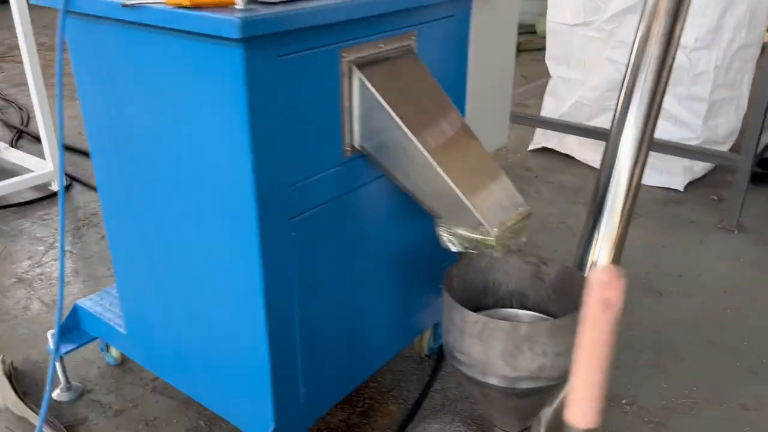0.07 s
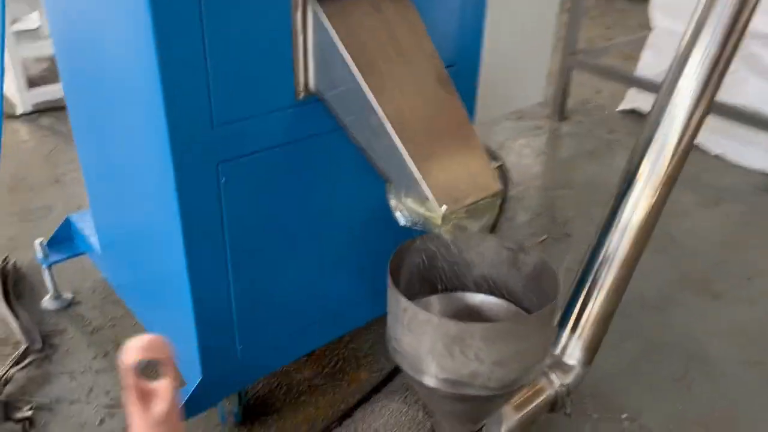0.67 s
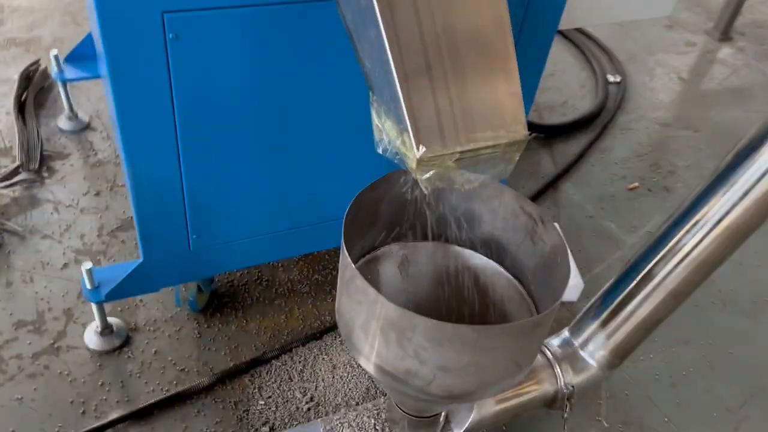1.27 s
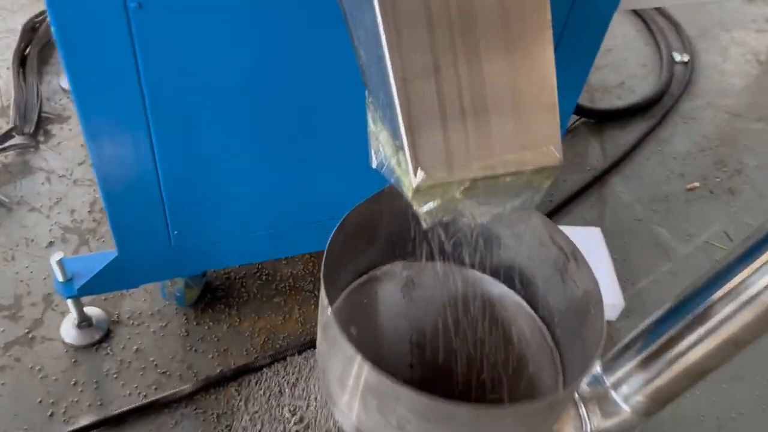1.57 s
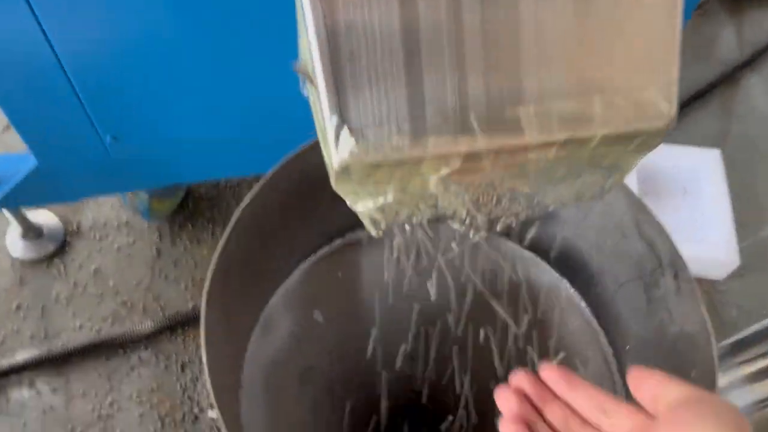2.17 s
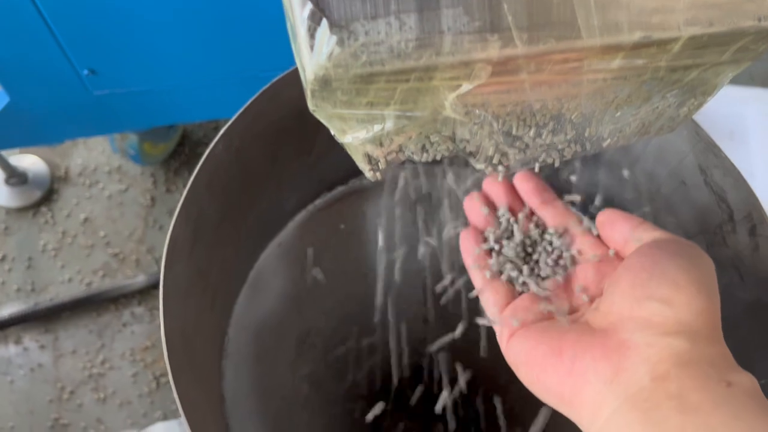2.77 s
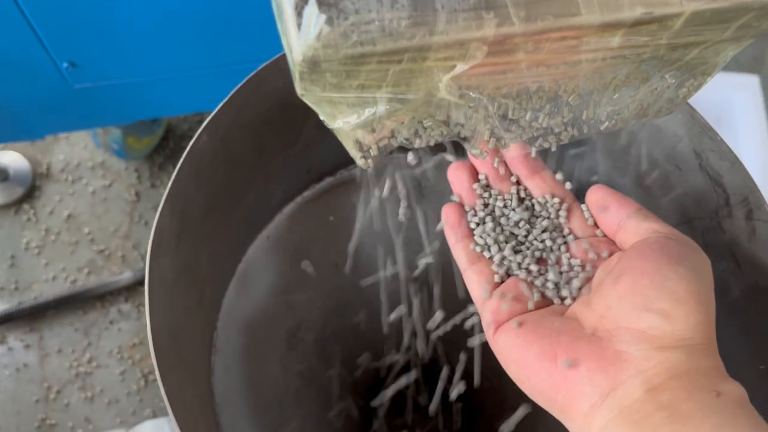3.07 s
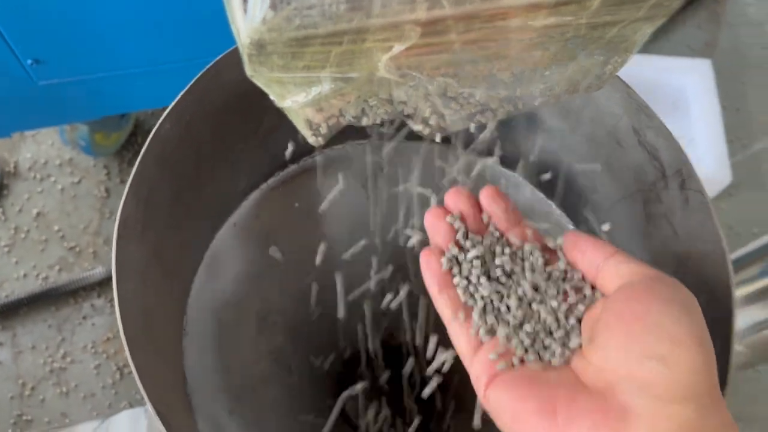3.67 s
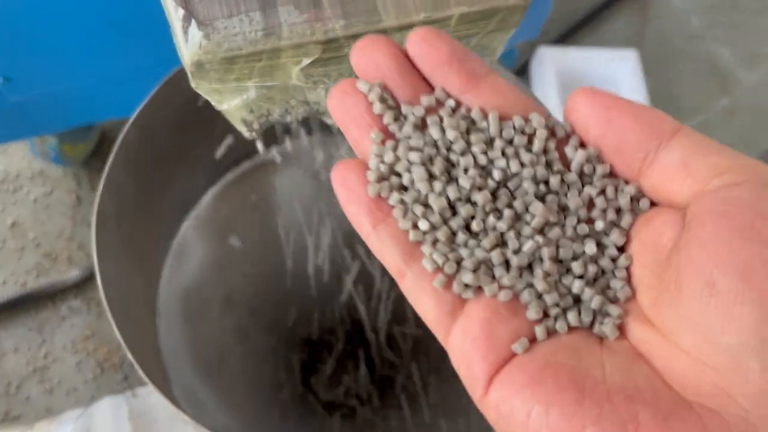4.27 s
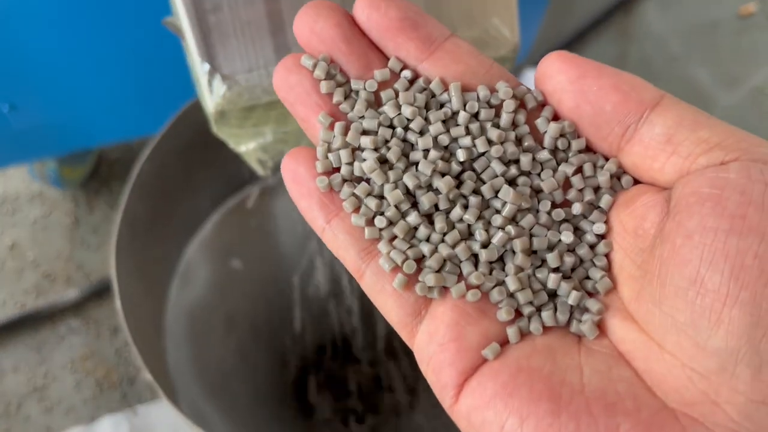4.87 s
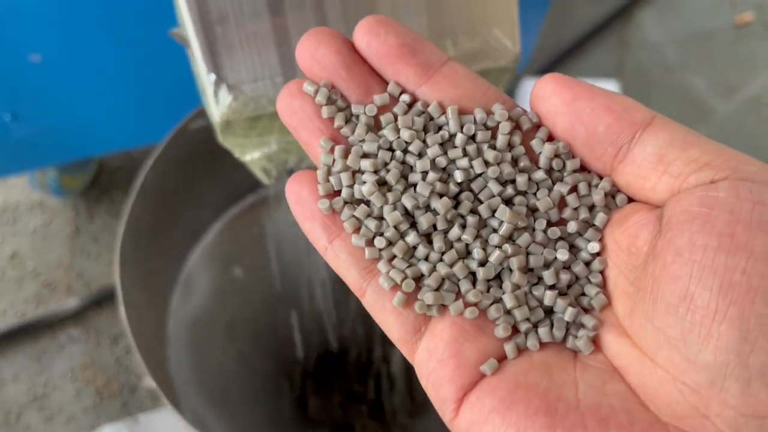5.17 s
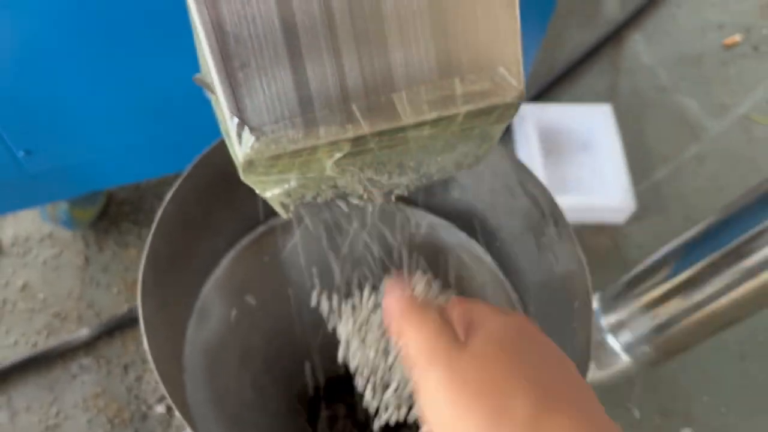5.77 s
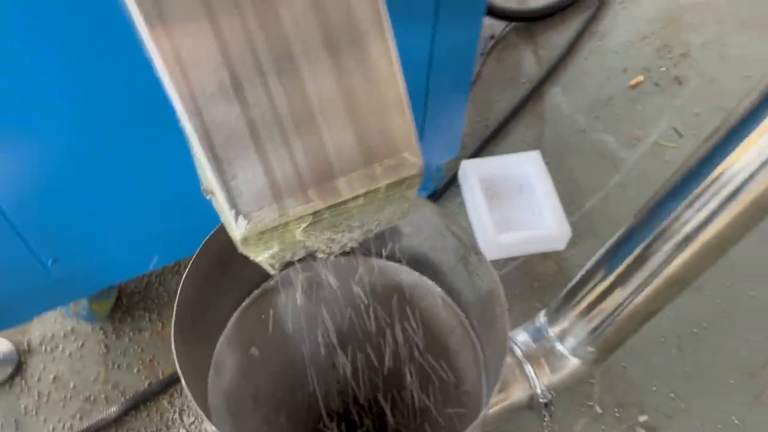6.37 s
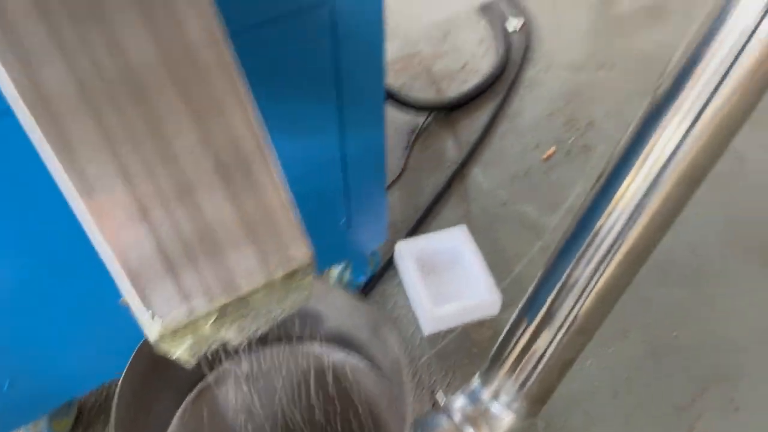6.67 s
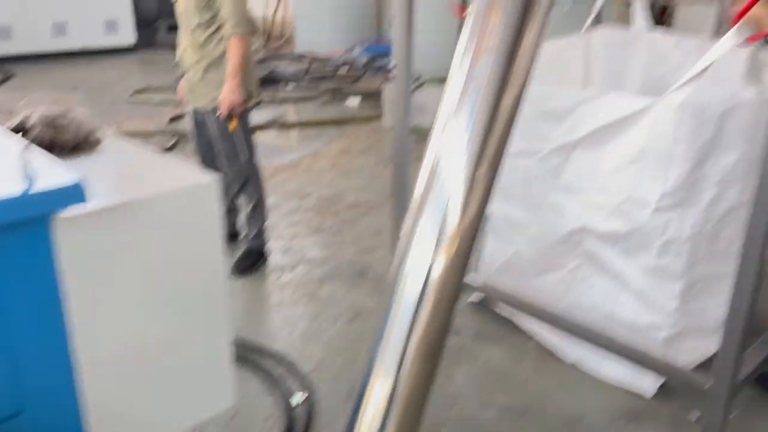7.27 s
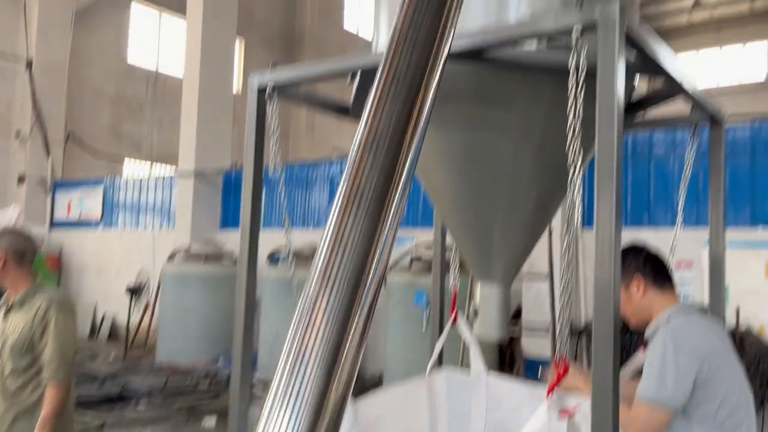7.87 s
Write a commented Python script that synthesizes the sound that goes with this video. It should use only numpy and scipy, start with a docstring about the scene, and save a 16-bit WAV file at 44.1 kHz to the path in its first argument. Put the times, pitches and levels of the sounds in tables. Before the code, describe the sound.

Loud factory machinery drones and a blower roars while plastic pellets hiss down a chute into a steel funnel.

```python
"""A factory hall, where we walk up to the outlet chute of a plastic granulating line and away again.
A blower roars and sings, motors hum, and the cutter shakes its steel cabinet into a booming drone.
A dense stream of pellets hisses down the chute into a steel funnel. Their countless tiny hits keep
the steel ringing, and now and then a stray pellet makes the funnel's rim ping."""
import sys
import numpy as np
from scipy import signal
from scipy.fft import rfft, irfft, next_fast_len
from scipy.io import wavfile
from scipy.ndimage import uniform_filter1d, map_coordinates

SR = 44100
rng = np.random.default_rng(int(sys.argv[2]) if len(sys.argv) > 2 else 0)


def put_to_file(sound):
    """Save the sound as 16-bit audio at rate SR, in the file named by the first command-line argument."""
    columns = np.atleast_2d(sound).T  # one column per channel
    safe = np.clip(columns, -1, 1)
    whole_steps = np.round(safe * 32767)
    wavfile.write(sys.argv[1], SR, whole_steps.astype(np.int16))


N = 358533

# Resonances are the pitches at which a part likes to ring.
# The machine's frame. Each row: pitch in Hz, width in Hz, level in dB.
FRAME_MODES = [(72.9, 8.1, 1.5), (83, 8, -4)]
# The cabinet's panels. Each row: pitch in Hz, width in Hz, level in dB.
PANEL_MODES = [(144.8, 8.9, -1), (159.6, 5.1, -1.2), (182.6, 13, 0.5), (199.4, 11, -4), (218, 12.5, -0.5)]
# The chute's housing. Each row: pitch in Hz, width in Hz, level in dB.
HOUSING_MODES = [(251.5, 14, 0)]
# The box around the cutter. Each row: pitch in Hz, width in Hz, level in dB.
CUTTER_BOX_MODES = [(286.6, 8.3, -1.4), (297, 41, -2.6)]
# The drive motor's casing. Each row: pitch in Hz, width in Hz, level in dB.
CASING_MODES = [(92, 9, -3.5), (115, 14, 4), (118, 19, 4)]
# The blower's duct. Each row: pitch in Hz, width in Hz, level in dB.
DUCT_MODES = [(523, 45, -0.5), (733, 50, -6.5), (838, 70, -5.5), (1083, 32, -4), (1530, 120, -5)]
# The sieve in the cabinet. Each row: pitch in Hz, width in Hz, level in dB.
SIEVE_MODES = [(1600, 200, 2), (1950, 240, -5.5), (2295, 50, -1.5), (3370, 220, 0), (3820, 260, 4)]
# The funnel's bowl. Each row: pitch in Hz, width in Hz, level in dB.
BOWL_MODES = [(954, 130, -3.5), (1112, 110, -5.5), (1200, 100, -3), (1312, 170, 0), (1440, 120, -4)]
# The pipe below the funnel. Each row: pitch in Hz, width in Hz, level in dB.
PIPE_MODES = [(439, 17, -8.5), (479.5, 34, -0.5), (515.6, 18, -5.5), (853, 160, -1.5)]
# The air inside the chute. Each row: pitch in Hz, width in Hz, level in dB.
CHUTE_AIR_MODES = [(535, 22, -7), (646, 110, 8.5), (730, 57, -5.5)]
# The funnel's steel wall. Each row: pitch in Hz, width in Hz, level in dB.
FUNNEL_WALL_MODES = [(2026, 220, 0.5), (2720, 260, 0.5), (3220, 320, -0.5), (3560, 480, -10.5),
                     (3930, 210, 0.5), (4300, 430, 5), (4600, 240, -1.5), (4820, 280, -5.5),
                     (5420, 150, 1.5), (5550, 90, -5), (6030, 210, 2), (6360, 180, 0)]
# The chute's sheet steel. Each row: pitch in Hz, width in Hz, level in dB.
CHUTE_WALL_MODES = [(1710, 170, 1.5), (2130, 120, -6.5), (4190, 80, -4), (4710, 48, 0.5), (5100, 60, -7),
                    (5250, 400, -4), (5550, 110, -1), (6200, 110, -2), (6500, 160, -3), (6890, 89, 1.5)]
# The funnel's rim. Each row: pitch in Hz, level in dB, seconds to fade by 60 dB.
RIM_MODES = [(5270, 6, 0.079), (6960, 1, 0.16)]

# The hum of the mains power. Each row: pitch in Hz, level in dB.
MAINS_TONES = [(49.7, -16.5)]
# The drive motor's hum. Each row: pitch in Hz, level in dB.
MOTOR_TONES = [(106, -2), (159, -2.5), (398, -13)]
# The cutter's two close tones. Each row: pitch in Hz, level in dB.
CUTTER_TONES = [(290.5, -8.5), (299.6, -6.5)]
# The singing of the blower's blades. Each row: pitch in Hz, level in dB.
BLADE_TONES = [(595, 2.5), (1194, -20)]
# The blower's roar, from bass to treble. Each row: frequency in Hz, level in dB.
ROAR_SPECTRUM = [(20, -32), (32, -17), (42, -10), (60, -9), (95, -8), (125, 4.5), (220, 1), (340, 0.5),
                 (400, -1), (440, -7.5), (600, -8.5), (950, -13), (1300, -15), (1500, -16), (2500, -22.5),
                 (6000, -30)]
# The clatter of sliding pellets. Each row: frequency in Hz, level in dB.
CLATTER_SPECTRUM = [(900, -3.5), (1650, 0), (2300, -2.5), (3000, -2), (3700, -2.5), (4400, -2), (5500, 0),
                    (7000, 0), (8500, -10), (11000, -3), (16000, -28)]
# The hiss of pellets ticking together. Each row: frequency in Hz, level in dB.
TICKING_SPECTRUM = [(4000, -9), (6000, -4.5), (6600, -2.5), (7300, 4), (8000, -7), (8900, 5), (9600, 4.5),
                    (11000, 3), (12500, 2.7), (14200, 1.7), (15700, -8)]

# Pellets striking the rim. Each row: start in seconds, level in dB, extra dB for the lowest note.
RIM_HITS = [(.16, -29, -12), (.4, -31, -1), (.931, -20, -14), (2.405, -23, -12), (2.495, -25, -12),
            (3.685, -23, -12), (3.945, -21, -17), (4.304, -27, -12), (4.374, -25, -13), (4.69, -26, -12),
            (5.025, -26, -10), (5.6, -26, -12), (6.39, -23.5, -15), (6.68, -27, -6), (6.875, -38, 4),
            (7.255, -24.5, -11), (7.279, -28, 1), (7.5, -31, -20), (7.561, -26, -20), (7.765, -21.5, -18),
            (8.071, -28, -10)]
# A short run of far-off clinks. Each row: start in seconds, pitch in Hz, level in dB.
FAR_CLINKS = [(.79, 2295, -29), (.822, 2050, -33), (.89, 2295, -28), (.985, 1690, -34), (1.0, 1900, -27),
              (1.012, 2670, -33), (1.03, 2490, -26)]
# How the left and right microphones differ. Each row: frequency in Hz, likeness from 0 to 1,
# the left's head start in radians, left minus right in dB.
STEREO_PAIR = [(60, .992, 0, 0), (150, .975, 0, -.3), (300, .987, 0, -.3), (480, .88, -.1, -2.5),
               (750, .82, .7, -2), (1200, .72, .3, 2), (1450, .3, -.4, 2), (1580, .4, -2.2, 2),
               (1720, .7, -.5, 1), (1900, .97, 0, 0), (2300, .94, 0, 0), (2700, .66, .5, 1.5),
               (3000, .62, .65, 1.5), (4700, .66, .2, 1), (5400, .65, -1.4, 1.5), (6500, .8, -1.3, 1),
               (7400, .82, -2.1, .5), (7750, .92, -2.7, 0), (8300, .999, -3.14, 0), (8750, .96, -3.35, 0),
               (9050, .87, -3.85, 0), (9400, .85, -4.1, 0), (10800, .86, -5.4, 0), (11400, .97, -6.1, 0),
               (12400, .97, -6.45, 0), (13300, .8, -7.5, 0), (14400, .84, -8.4, 0), (15000, .99, -9.3, 0)]

# Level curves over time. Only their rise and fall around their own average counts.
# The pellet stream, loudest as we lean over the outlet. Each row: time in seconds, level in dB.
STREAM_CURVE = [(0, -29.5), (1.6, -25), (1.85, -24.5), (2.04, -22.5), (2.6, -26), (3.4, -27.5),
                (3.85, -25.5), (4.59, -29), (5.67, -29), (6.12, -28), (6.3, -30), (8.05, -33.5)]
# The funnel's wall flares as we lean over the rim, then a raised handful screens it.
# Each row: time in seconds, level in dB.
FUNNEL_WALL_CURVE = [(0, -36), (1.3, -38), (1.7, -39), (1.85, -32.5), (2.02, -31), (2.25, -29),
                     (3.3, -29.5), (3.9, -36), (4.5, -44), (5.5, -39), (6.1, -34.5), (6.7, -40.5),
                     (8.13, -43.5)]
# The chute's steel, clearest from beside it. Each row: time in seconds, level in dB.
CHUTE_WALL_CURVE = [(0, -42.5), (1.6, -42), (2.05, -39), (3.3, -55), (4.6, -31.5), (6.1, -35.5),
                    (6.65, -42), (8.13, -42)]
# The chute's hollow tone, loudest at its opening. Each row: time in seconds, level in dB.
CHUTE_AIR_CURVE = [(0, -50), (1.0, -31.5), (1.5, -32), (2.0, -26), (2.6, -34), (3.6, -31.5), (4.6, -35),
                   (5.9, -33), (6.6, -37), (7.4, -45), (8.13, -42)]
# The funnel's mouth, which beams upwards. Each row: time in seconds, level in dB.
MOUTH_CURVE = [(0.0, -41.5), (1.3, -37.5), (2.22, -27), (3.45, -30.5), (4.59, -35.5), (5.74, -34),
               (6.5, -37.5), (7.5, -44.5), (8.05, -43.5)]
# The pipe, heard as we look straight down it. Each row: time in seconds, level in dB.
PIPE_CURVE = [(0, -37), (1.3, -45.5), (2.0, -33), (2.6, -27), (3.6, -30.5), (4.5, -35.5), (5.9, -40),
              (6.4, -49), (8.13, -52)]
# The housing's growl swells unevenly, is loudest near two to three seconds, then fades.
# Each row: time in seconds, level in dB.
HOUSING_CURVE = [(0, -33.5), (1.0, -31.5), (1.4, -23), (1.65, -30), (1.92, -14), (2.25, -22), (2.7, -22),
                 (2.92, -14.5), (3.15, -21.5), (4.0, -23), (4.95, -27.5), (5.47, -21.5), (5.75, -27.5),
                 (6.0, -24.5), (6.45, -26.5), (6.68, -21), (6.95, -30), (8.13, -34)]
# The cutter's drone. Each row: time in seconds, level in dB.
CUTTER_CURVE = [(0, -31.5), (.95, -27), (1.25, -21), (1.57, -21), (1.67, -11), (1.85, -22.5), (2.03, -14.5),
                (2.65, -21), (3.75, -16), (3.92, -21), (4.2, -23.5), (5.1, -21), (5.7, -23), (6.15, -26),
                (7.0, -23), (7.27, -29), (8.13, -29.5)]
# The frame's low boom swells unevenly and fades overall. Each row: time in seconds, level in dB.
FRAME_CURVE = [(0, -24), (.4, -26), (.6, -21), (1.05, -28.5), (1.72, -33), (1.88, -19.5), (2.1, -31),
               (2.6, -25), (2.8, -28), (3.5, -35), (4.05, -28.5), (4.8, -32.5), (5.45, -30), (6.05, -38),
               (6.8, -34.5), (8.13, -40.5)]
# The panels' drone. Each row: time in seconds, level in dB.
PANEL_CURVE = [(0, -18), (.25, -22.5), (.6, -18.5), (1.3, -18.5), (1.55, -16), (2.2, -15.5), (2.8, -18),
               (3.4, -16.5), (4.6, -22), (5.0, -19.5), (5.72, -22), (6.3, -22.5), (6.54, -19.5),
               (6.76, -24.5), (7.0, -22.5), (7.8, -27)]
# The motor, screened by the cabinet once we reach the outlet. Each row: time in seconds, level in dB.
MOTOR_CURVE = [(0, -24), (1.0, -23.5), (1.9, -30), (3.1, -43), (4.0, -38), (8.13, -36.5)]
# The blower's blade tone. Each row: time in seconds, level in dB.
BLADE_CURVE = [(0, -41), (.45, -34.5), (.75, -39), (1.0, -35.5), (1.24, -27.5), (1.4, -35), (2.1, -39),
               (2.6, -43), (3.5, -38.5), (5.6, -41), (6.03, -51), (6.25, -40.5), (7.1, -40.5), (7.65, -39),
               (8.13, -59)]

# Base levels of the parts, before the tables raise or lower them.
FRAME_DB, PANELS_DB, HOUSING_DB, CUTTER_DB, CUTTER_BOX_DB = -32.5, -23, -27.5, -23.5, -28.5
MAINS_DB, MOTOR_DB, CASING_DB, BLADES_DB = -31.5, -37, -38.5, -40.5
ROAR_DB, DUCT_DB, BOWL_DB, PIPE_DB, CHUTE_AIR_DB, SIEVE_DB = -26, -40, -35, -39.5, -35, -48.5
CLATTER_DB, FUNNEL_WALL_DB, CHUTE_WALL_DB, TICKING_DB, RIM_DB = -28.5, -37.5, -43, -27.5, -2.0


def from_db(db):
    """Turn decibels into a gain, the number to multiply a sound by."""
    return 10 ** (np.asarray(db) / 20)


def rms_one(x):
    """Scale a signal to an average power of 1."""
    return x / np.sqrt(np.mean(x ** 2) + 1e-20)


def bins():
    """The frequencies in Hz of a spectrum a little longer than the scene."""
    return np.maximum(np.fft.rfftfreq(2 * next_fast_len(N // 2 + 1), 1 / SR), 1)


def over_hz(rows):
    """Fill in a table's columns at every frequency, on a log scale."""
    hz, *columns = np.transpose(rows)
    return [np.interp(np.log(bins()), np.log(hz), column) for column in columns]


def colour(points):
    """The gain at every frequency of a smooth spectrum."""
    return from_db(over_hz(points)[0])


def resonances(modes):
    """The gain at every frequency of a ringing body: one steep peak for each row."""
    f = bins()
    peaks = (from_db(db) ** 2 / width / (1 + (2 * (f - hz) / width) ** 2) ** 2 for hz, width, db in modes)
    return np.sqrt(sum(peaks))


def swing(curve, share=1):
    """A gain that follows a share of a level curve's rise and fall."""
    db = np.interp(np.arange(N) / SR, *np.transpose(curve))
    return from_db(share * (db - db.mean()))


def receding(db_per_s):
    """The falling gain of a source we walk away from; it is 1 halfway through."""
    return from_db(-db_per_s * (np.arange(N) - N / 2) / SR)


def drift(rate_hz):
    """A slow random wobble with a typical size of 1."""
    step, warm_up = 100, 2000   # samples per step, steps thrown away
    pole = np.exp(-2 * np.pi * step * rate_hz / SR)
    noise = rng.standard_normal(N // step + warm_up + 2)
    slow = signal.lfilter([1], [1, -2 * pole, pole * pole], noise)[warm_up:]
    return np.interp(np.arange(N) / step, np.arange(len(slow)), rms_one(slow))


def turbulence():
    """Two unrelated random forces."""
    return rng.standard_normal((2, N))


def impacts(per_s, spread_db, clump_db):
    """Two streams of tiny hits of uneven size, swelling in clumps."""
    hits = rng.random((2, N)) < per_s / SR
    sizes = from_db(spread_db * np.minimum(rng.exponential(1, (2, N)), 4))
    signs = rng.choice([-1, 1], (2, N))
    return hits * sizes * signs * from_db(clump_db * drift(11.6))


def crowded(force, spacing_hz, depth_db, changes_per_s):
    """Countless overlapping resonances ripple the spectrum; the pattern shifts as we move."""
    hz, seconds, frames = signal.stft(force, SR, nperseg=4096)
    pattern = rng.standard_normal((4096, 64))
    where = np.meshgrid(hz / spacing_hz, seconds * changes_per_s, indexing="ij")
    ripple = from_db(depth_db * map_coordinates(pattern, where, order=1, mode="wrap"))
    return signal.istft(frames * ripple, SR)[1][:, :N]


def radiate(force, gain):
    """Two forces sound through a body and reach left and right, at a power of 1."""
    alike, lead, tilt_db = over_hz(STEREO_PAIR)
    alike = np.clip(alike, 0, 1)
    direct, diffuse = rfft(force, 2 * (len(gain) - 1)) * gain
    direct, diffuse = direct * np.sqrt(1 + alike), diffuse * np.sqrt(1 - alike)
    turn = from_db(tilt_db / 2) * np.exp(.5j * lead)   # each side gets half the level and phase gap
    left, right = (direct + diffuse) * turn, (direct - diffuse) / turn
    return rms_one(irfft([left, right])[:, :N])


def shaken(modes):
    """A body rings as random forces push it."""
    return radiate(turbulence(), resonances(modes))


def steadied(x, window_s, share):
    """A machine under constant load gives even power, so flatten a share of the swells."""
    power = uniform_filter1d(np.mean(x ** 2, axis=0), int(window_s * SR))
    return rms_one(x / (power + 1e-9) ** (share / 2))


def hum(tones, wander_hz, flutter_db):
    """Tones of turning parts, each wavering a little in pitch and level."""
    out = 0
    for hz, db in tones:
        turns = rng.random() + np.cumsum(hz + wander_hz * drift(2.63)) / SR
        level = np.sqrt(2) * from_db(db + flutter_db * drift(5.9))
        out = out + level * np.sin(2 * np.pi * turns)
    return out


def clinks(rise_s=0.0049, fade_s=0.13):
    """Faint metal clinks, each ringing on one note; the hall softens their start."""
    out, t = np.zeros((2, N)), np.arange(SR // 4) / SR
    shape = (1 - np.exp(-t / rise_s)) * from_db(-60 * t / fade_s)
    for start_s, hz, db in FAR_CLINKS:
        start = int(start_s * SR)
        out[:, start:start + len(t)] += from_db(db) * shape * np.sin(2 * np.pi * hz * t)
    return out


def sieve():
    """Pellets make the sieve ring; the cabinet screens it like the motor."""
    sifting = impacts(per_s=3000, spread_db=4.5, clump_db=1.5)
    return from_db(SIEVE_DB) * swing(MOTOR_CURVE, share=0.67) * radiate(sifting, resonances(SIEVE_MODES))


def blower_duct():
    """Rushing air makes the duct drone."""
    return from_db(DUCT_DB) * receding(db_per_s=0.9) * shaken(DUCT_MODES)


def blower_blades():
    """The spinning blades sing, a little to the right."""
    tone = hum(BLADE_TONES, wander_hz=1.31, flutter_db=1.8)
    return from_db(BLADES_DB) * swing(BLADE_CURVE) * tone * from_db([[-1.5], [1.5]])


def blower_roar():
    """The blower's swirling air fills the hall with a roar."""
    level = from_db(ROAR_DB) * receding(db_per_s=1.0) * swing(MOUTH_CURVE, share=0.24)
    return level * radiate(turbulence(), colour(ROAR_SPECTRUM))


def motors():
    """The mains hums, loudest by the outlet; the drive motor hums and its casing rumbles."""
    mains = from_db(MAINS_DB) * hum(MAINS_TONES, wander_hz=0.24, flutter_db=2.5)
    drive = from_db(MOTOR_DB) * hum(MOTOR_TONES, wander_hz=0.48, flutter_db=3.5)
    casing = from_db(CASING_DB) * shaken(CASING_MODES)
    return swing(MOUTH_CURVE, share=1.05) * mains + swing(MOTOR_CURVE) * (drive + casing)


def hollow_tones():
    """Pellets drum on the funnel's bowl, and the air in the chute and pipe rings hollow."""
    hits = impacts(per_s=3000, spread_db=2.5, clump_db=1.4)
    drumming = crowded(hits, spacing_hz=12, depth_db=2.5, changes_per_s=0.585)
    bowl = from_db(BOWL_DB) * swing(MOUTH_CURVE, share=1.07) * radiate(drumming, resonances(BOWL_MODES))
    chute = from_db(CHUTE_AIR_DB) * swing(CHUTE_AIR_CURVE) * shaken(CHUTE_AIR_MODES)
    pipe = from_db(PIPE_DB) * swing(PIPE_CURVE) * shaken(PIPE_MODES)
    return bowl + chute + pipe


def cabinet():
    """Shaken by the cutter, the frame booms, the panels drone and the housing growls."""
    boom = swing(FRAME_CURVE) * steadied(shaken(FRAME_MODES), window_s=0.22, share=1)
    drone = swing(PANEL_CURVE) * steadied(shaken(PANEL_MODES), window_s=0.39, share=0.99)
    growl = swing(HOUSING_CURVE) * steadied(shaken(HOUSING_MODES), window_s=0.13, share=0.34)
    return from_db(FRAME_DB) * boom + from_db(PANELS_DB) * drone + from_db(HOUSING_DB) * growl


def cutter():
    """The cutter's box rings while the knives' two close tones throb against each other."""
    box = from_db(CUTTER_BOX_DB) * steadied(shaken(CUTTER_BOX_MODES), window_s=0.42, share=1)
    knives = from_db(CUTTER_DB) * hum(CUTTER_TONES, wander_hz=1.176, flutter_db=2.0)
    return swing(CUTTER_CURVE) * (box + knives)


def rim_pings(rise_s=0.003, rough_hz=70):
    """A stray pellet skitters on the rim; where it lands sets how strongly the lowest note rings."""
    out, t = np.zeros((2, N)), np.arange(SR // 5) / SR
    rise = 1 - np.exp(-t / rise_s)
    leads = over_hz(STEREO_PAIR)[1]
    for start_s, db, low_db in RIM_HITS:
        start = int(start_s * SR)
        for k, (hz, mode_db, fade_s) in enumerate(RIM_MODES):
            # Skittering smears each note into a band rough_hz wide.
            smear = np.sqrt(2 * np.pi * rough_hz / SR) * np.cumsum(rng.standard_normal(len(t)))
            phase = smear + np.interp(hz, bins(), leads) * np.array([[.5], [-.5]])
            level = rise * from_db(db + mode_db + low_db * (k == 0) - 60 * t / fade_s)
            ping = level * np.sin(2 * np.pi * hz * t + phase)
            out[:, start:start + len(t)] += ping[:, :N - start]
    return from_db(RIM_DB) * out


def pellets():
    """Thousands of pellets a second clatter down, ring the steel and tick against each other."""
    sliding = crowded(impacts(per_s=12000, spread_db=1.5, clump_db=0.55),
                      spacing_hz=31.98, depth_db=3.5, changes_per_s=1.206)
    landing = crowded(impacts(per_s=6000, spread_db=1.0, clump_db=-0.1),
                      spacing_hz=44.9, depth_db=2.5, changes_per_s=1.35)
    bouncing = crowded(impacts(per_s=4400, spread_db=-0.5, clump_db=1.5),
                       spacing_hz=62.2, depth_db=-2.0, changes_per_s=2.37)
    jostling = crowded(impacts(per_s=13000, spread_db=2.0, clump_db=0.5),
                       spacing_hz=39.2, depth_db=3.0, changes_per_s=1.35)
    nearness = swing(STREAM_CURVE, share=0.69) * swing(FUNNEL_WALL_CURVE, share=0.2)
    clatter = nearness * receding(db_per_s=0.3) * radiate(sliding, colour(CLATTER_SPECTRUM))
    funnel = swing(FUNNEL_WALL_CURVE) * radiate(landing, resonances(FUNNEL_WALL_MODES))
    chute = swing(CHUTE_WALL_CURVE) * radiate(bouncing, resonances(CHUTE_WALL_MODES))
    ticking = swing(STREAM_CURVE, share=0.84) * radiate(jostling, colour(TICKING_SPECTRUM))
    steel = from_db(FUNNEL_WALL_DB) * funnel + from_db(CHUTE_WALL_DB) * chute
    return from_db(CLATTER_DB) * clatter + steel + from_db(TICKING_DB) * ticking


def scene():
    """The whole line running."""
    machine = cabinet() + cutter() + motors()
    air = blower_blades() + blower_roar() + hollow_tones() + blower_duct()
    return machine + air + pellets() + sieve() + rim_pings() + clinks()


def record(dry, ceiling=0.88, cutoff_hz=15750):
    """Round off the tallest peaks and cut away the highest treble."""
    rounded = dry / (1 + (dry / ceiling) ** 8) ** (1 / 8)
    return signal.sosfilt(signal.ellip(12, .1, 90, cutoff_hz, fs=SR, output="sos"), rounded)


dry = scene()
out = record(dry)
put_to_file(out)
```